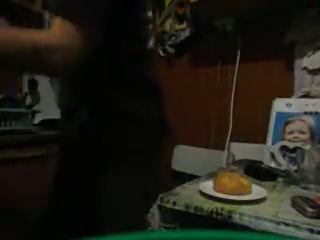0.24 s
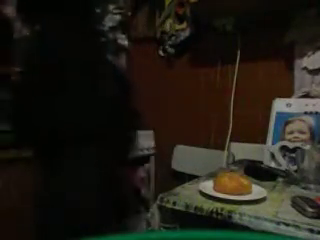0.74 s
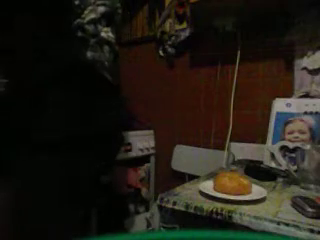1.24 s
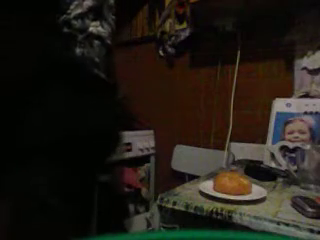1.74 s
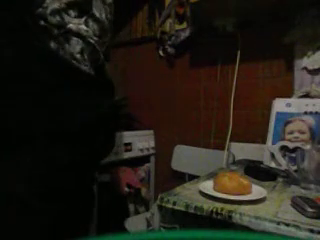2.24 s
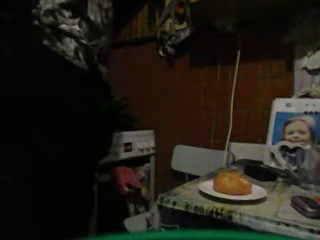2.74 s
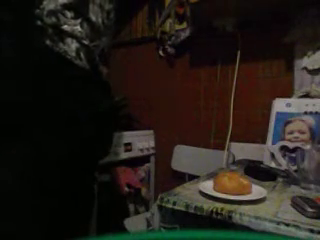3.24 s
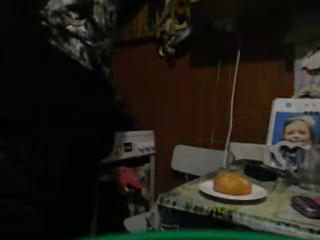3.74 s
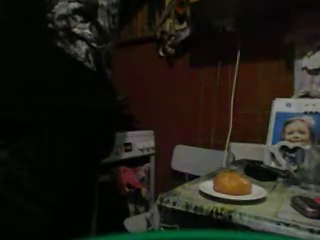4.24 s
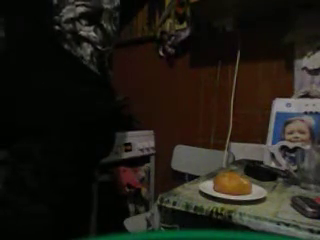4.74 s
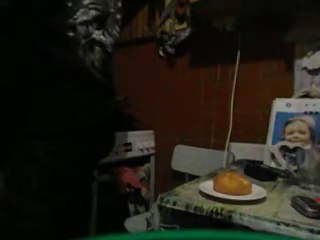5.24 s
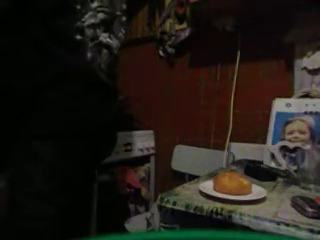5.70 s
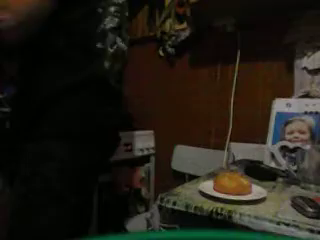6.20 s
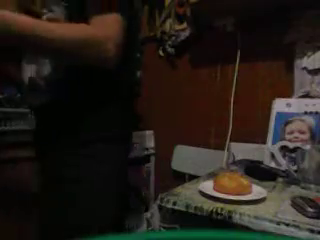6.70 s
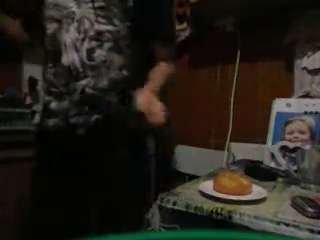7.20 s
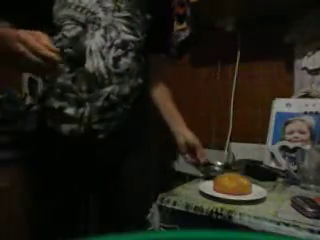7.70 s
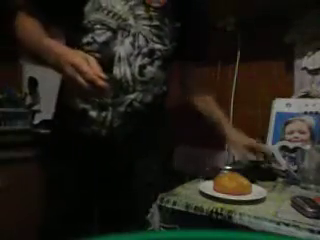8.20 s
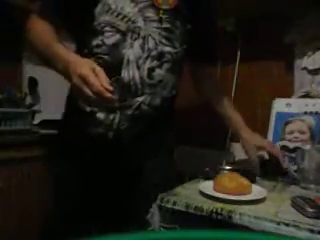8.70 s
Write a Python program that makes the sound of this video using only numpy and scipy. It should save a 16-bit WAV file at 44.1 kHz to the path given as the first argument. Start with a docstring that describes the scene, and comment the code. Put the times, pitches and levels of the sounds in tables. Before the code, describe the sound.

Soft thuds, a burst of clattering dishes, two sharp wooden knocks, then a bowl set down and faint metal ringing over hiss.

```python
"""Light taps and soft thuds of feet and a cupboard come first, over a faint rustle in a small kitchen.
Then crockery rattles in a rack, the cupboard door knocks, a bowl is set down and a steel dish rings.
Each rattle or knock is a burst of tiny contacts that set the object ringing. A cheap 8-bit converter
rounds the sound coarsely, so a slow pressure drift flips the last bit and makes the hiss stutter."""
import sys
import numpy as np
from scipy import signal
from scipy.fft import rfft, irfft, next_fast_len
from scipy.io import wavfile

SR = 44100
rng = np.random.default_rng(int(sys.argv[2]) if len(sys.argv) > 2 else 0)


def unload_wav(signal):
    """Save mono or channel-first audio to the path in sys.argv[1] as 16-bit WAV at rate SR, clipped to [-1, 1]."""
    wavfile.write(
        sys.argv[1],
        SR,
        np.round(np.clip(np.atleast_2d(signal).T, -1, 1) * 32767).astype(np.int16),
    )


N = 394694


def from_db(db):
    """Turn decibels into a gain."""
    return 10 ** (np.asarray(db) / 20)


def ring(clicks, hz, ring_s):
    """Each click starts a tone that fades by 60 dB over its ring time, ring_s."""
    fade, turn = from_db(-60 / (ring_s * SR)), 2 * np.pi * hz / SR
    return signal.lfilter([0, np.sin(turn)], [1, -2 * fade * np.cos(turn), fade * fade], clicks + 1e-18)


def coloured(gain_at):
    """Noise of average power 1, with its lows and highs shaped by gain_at(hz)."""
    size = next_fast_len(N)
    hz = np.fft.rfftfreq(size, 1 / SR) + .1
    noise = irfft(rfft(rng.standard_normal(size)) * gain_at(hz), size)[:N]
    return noise / np.sqrt(np.mean(noise ** 2) + 1e-20)


# Slow swings of air pressure. Each row: centre in Hz, width in Hz, level in dB.
PRESSURE_SWINGS = [(1.475, 1.7, -44.5), (11.12, 9.2, -43), (30.1, 41, -59)]

def air():
    """The pressure drifts, mostly too slowly to hear, under the room's low murmur."""
    drift = sum(from_db(db) * coloured(lambda f: 1 / (1 + ((f - hz) / width) ** 2))
                for hz, width, db in PRESSURE_SWINGS)
    murmur = from_db(-58) * coloured(lambda f: 1 / (1 + (f / 250) ** 2))
    return drift + murmur


# Cloth and hands moving all along. Each row: time in seconds, level in dB.
RUSTLE_LEVELS = [(0, -51), (.6, -58.5), (1.1, -58.5), (1.8, -56.5), (2.5, -63.5), (3.201, -55),
                 (3.501, -47), (4.401, -48), (4.75, -56), (5.1, -57), (5.8, -63.5), (6.5, -56.5),
                 (7.302, -57.5), (8.1, -58.5), (8.95, -64.5)]
# The tone of the rustle. Each row: frequency in Hz, level in dB.
RUSTLE_TONE = [(100, -24), (700, -12.5), (1500, -5.5), (2400, -2.5), (3500, -5.5), (5000, -6.5),
               (6000, -15.5)]
# Quick arm movements. Each row: middle in seconds, top level in dB, half length in seconds.
ARM_SWISHES = [(7.139, -49, 0.099), (7.491, -41.5, 0.059), (8.325, -51.5, 0.03), (8.531, -50, 0.061)]

def rustle():
    """Rubbing cloth makes a soft hiss that swells with each movement."""
    t = np.arange(N) / SR
    hz, tone_db = np.transpose(RUSTLE_TONE)
    hiss = coloured(lambda f: from_db(np.interp(np.log(f), np.log(hz), tone_db)))
    handling = from_db(np.interp(t, *np.transpose(RUSTLE_LEVELS)))
    swishes = sum(from_db(db) * np.exp(-((t - at) / half_s) ** 2) for at, db, half_s in ARM_SWISHES)
    return (handling + swishes) * hiss


# Touches on the steel dish. Each row: start in seconds, level in dB.
STEEL_TOUCHES = [(7.82, -46.5), (7.9, -44), (8.277, -44.5)]
# The dish's tones. Each row: pitch in Hz, level in dB, ring time in seconds.
STEEL_TONES = [(700, -12, 1.0), (1152, -17, 1.5), (1895, -10, 4.0), (2245, -6, .3), (3854, -5, .9),
               (4910, -1, .5)]

def steel_dish():
    """Steel rings on with a few thin tones after each touch."""
    clicks = np.zeros(N)
    for start_s, db in STEEL_TOUCHES:
        clicks[round(start_s * SR)] = from_db(db)
    return sum(from_db(db) * ring(clicks, hz, ring_s) for hz, db, ring_s in STEEL_TONES)


# Soft blows. Each row: start in seconds, floor, cupboard and door levels in dB, loss per bounce in dB.
BLOWS = [(0.222, -60, -73, -52, 14), (.41, -76, -64.5, -49.5, 1), (.49, -62, -65, -53.5, 1.5),
         (0.745, -36.5, -34, -39.5, 2), (.861, -42.5, -48.5, -45.5, 2), (.945, -33, -32, -40, 3),
         (1.217, -39.5, -44, -51, 14.5), (1.629, -51.5, -45, -45, 4), (1.749, -60.5, -58, -53, 2.5),
         (1.95, -52.5, -39.5, -58.5, 14.5), (5.378, -30.5, -39, -46, 9), (5.408, -32, -20.5, -32, 4),
         (6.281, -11.5, -15.5, -11, 3.5), (6.37, -27, -32.5, -31.5, 3), (6.535, -17, -18.5, -16, 5),
         (6.625, -42, -46, -30.5, 4.5), (6.72, -48.5, -49, -47, 3), (6.848, -31, -37.5, -38, 3.5),
         (7.683, -55, -34.5, -31.5, 24), (8.316, -36, -36.5, -38, 7.5)]
# How hard a dish hit shakes the floor, cupboard and door, in dB compared with the hit.
SHAKE_DB = [-49.5, -44.5, -41]
# Deep tones. Each row: pitch in Hz, level in dB, ring time in seconds, part (0 floor, 1 cupboard, 2 door).
DEEP_TONES = [(44.3, -4, 0.21, 0), (70.3, -0.5, 0.15, 0), (94.5, -6, .15, 0), (123.6, -9.5, 0.1, 1),
              (146.8, -2, 0.21, 1), (190.5, -8.5, 0.25, 2), (217.5, -5, .28, 2), (233, -0.5, .2, 2),
              (259, -6, 0.16, 2)]

def thuds(bounce_s=0.017, shake_loss_db=3.5):
    """Soft blows and the DISH_HITS (below) shake floor, cupboard and door in five fading pushes."""
    shakes = [(start_s, *(db + np.array(SHAKE_DB)), shake_loss_db) for start_s, db, *_ in DISH_HITS]
    blows = np.array(BLOWS + shakes)
    start_s, part_db, loss_db = blows[:, :1], blows[:, 1:4], blows[:, 4:]
    bounce = np.arange(5)
    delay_s = bounce_s * bounce * rng.uniform(0.9, 1.2, size=(len(blows), 5))
    at = np.round((start_s + delay_s) * SR).astype(int)
    signs = rng.choice([-1, 1], size=(len(blows), 5, len(DEEP_TONES)))
    boom = 0
    for sign, (hz, db, ring_s, part) in zip(np.moveaxis(signs, 2, 0), DEEP_TONES):
        pushes = np.zeros(N)
        pushes[at] = sign * from_db(part_db[:, round(part), None] - loss_db * bounce + db)
        boom = boom + ring(pushes, hz, ring_s)
    return signal.sosfilt(signal.butter(2, [48, 330], "band", fs=SR, output="sos"), boom)


def chatter(length_s, settle_s, soft_start, first_db, contacts_per_s, uneven_db):
    """Two things meet: one first contact, then uneven ones that go on for a while and settle."""
    t = np.arange(round(.25 * SR)) / SR
    sizes = from_db(uneven_db * np.minimum(rng.exponential(1, t.size), 3)) * rng.choice([-1, 1], t.size)
    touching = rng.random(t.size) < contacts_per_s / SR
    touching[0], sizes[0] = True, from_db(first_db)
    swell = 1 - soft_start * np.exp(-t / (.18 * length_s))
    shape = swell * np.exp(-np.maximum(t - length_s, 0) / settle_s)
    clicks = sizes * touching * shape
    return clicks * np.linalg.norm(shape) / np.linalg.norm(clicks)   # the shape alone sets the energy


def struck(hits, tones, ring_db, crack_db, crack_hz, crack_reach, focus_db, damping, **contacts):
    """Each contact makes a short crack and rings all the tones; damping divides their ring times."""
    hz, tone_db, ring_s = np.transpose(tones)
    drive, crack = np.zeros((len(tones), N + SR)), np.zeros(N + SR)
    spots, spot_s = 16, .024   # the pieces meet at a new spot this often, harder or softer
    for start_s, level_db, length_s, settle_s, low_hz, high_hz, hard_db in hits:
        at = round(start_s * SR)
        clicks = from_db(level_db) * chatter(length_s, settle_s, **contacts)
        spot = np.minimum(np.arange(clicks.size) / SR / spot_s, spots - 1).astype(int)
        force_db = 1.4 * rng.standard_normal(spots) * (np.arange(spots) > 0)
        clicks = clicks * from_db(force_db)[spot]
        # Tones near the pitches of the two pieces get up to focus_db extra.
        octaves_away = np.minimum(abs(np.log2(hz / low_hz)), abs(np.log2(hz / high_hz)))
        near = np.exp(-(octaves_away / 0.069) ** 2)
        tilt_db = np.clip(hard_db, -6, 4) * np.log2(hz / crack_hz)   # a harder contact is brighter
        chance = from_db(2.5 * rng.standard_normal((hz.size, spots)))
        chance *= rng.choice([-1, 1], size=chance.shape)
        gains = from_db(ring_db + tone_db + focus_db * near + tilt_db)[:, None] * chance
        drive[:, at:at + clicks.size] += gains[:, spot] * clicks
        centre_hz = crack_hz * np.clip(from_db(0.66 * hard_db), .3, 2)
        edges_hz = [centre_hz / crack_reach, min(centre_hz * 1.9, 9000)]
        band = signal.butter(3, edges_hz, "band", fs=SR, output="sos")
        crack[at:at + clicks.size] += from_db(crack_db) * signal.sosfilt(band, clicks)
    ringing = sum(map(ring, drive, hz, ring_s / damping))
    return (crack + ringing)[:N]


# The bowl lands. Each row: start in seconds, level in dB, chatter and settling times in seconds,
# pitches of the lower and higher piece in Hz, hardness in dB per octave (more is brighter).
BOWL_LANDING = [(7.681, -13.5, 0.02, 0.025, 1160, 1980, -2.4)]
# The bowl's tones. Each row: pitch in Hz, level in dB, ring time in seconds before damping.
BOWL_TONES = [(328, -6, .14), (528, -8, .22), (861, -10, .15), (926, -8, .15), (1157, -3, .22),
              (1400, -6, .08), (1593, -5, .1), (1809, -8, .18), (1949, -4, .14), (2121, -7, .18),
              (2363, -10, .12)]

def bowl():
    """A bowl meets the table, chatters and rings briefly."""
    return struck(BOWL_LANDING, BOWL_TONES, ring_db=-40.5, focus_db=2.5, damping=1.3,
                  crack_db=-2, crack_hz=955, crack_reach=3.4,
                  first_db=7, contacts_per_s=390, uneven_db=-4.5, soft_start=0.041)


# Taps and door knocks. Each row reads as in BOWL_LANDING.
WOOD_HITS = [(.206, -21.5, 0.012, 0.0051, 1200, 4900, 10), (.224, -23, 0.0066, 0.021, 1480, 4310, 5),
             (.795, -29.5, 0.01, .01, 436, 1640, -2.5), (.949, -33.5, 0.015, 0.014, 516, 3300, -4),
             (1.052, -36.5, 0.02, 0.013, 1370, 2920, 1.5), (1.212, -26, 0.0071, .01, 1470, 2780, 2.5),
             (1.329, -42, 0.016, .01, 3060, 4500, 4), (1.619, -36.5, 0.0083, .01, 431, 2440, -7),
             (5.381, -31, 0.013, .01, 540, 2360, -5.5), (5.406, -10, 0.0064, 0.011, 1340, 1920, -4.5),
             (6.282, 0, 0.013, 0.015, 1170, 2960, 2.5), (6.31, -6.5, 0.0058, 0.024, 1500, 2600, -1.5),
             (6.449, -36.5, .009, .01, 2800, 4700, 3), (6.532, -5, 0.014, 0.014, 1490, 2710, 1),
             (6.844, -30, 0.016, 0.011, 1110, 2500, -3)]
# The wood's tones. Each row: pitch in Hz, level in dB, ring time in seconds before damping.
WOOD_TONES = [(517, -9, .04), (790, -5, .035), (880, -4, .04), (1060, -3, .04), (1340, -1, .04),
              (1650, -4, .035), (2000, -3, .035), (2470, -2, .035), (2800, 0, .035), (3300, -3, .03),
              (4200, -3, .03), (4900, -3, .03)]

def wood_knocks():
    """Wood stops ringing almost at once, so taps and door knocks sound dry."""
    return struck(WOOD_HITS, WOOD_TONES, ring_db=-45, focus_db=3, damping=2.2,
                  crack_db=-6, crack_hz=1807, crack_reach=5.7,
                  first_db=9.5, contacts_per_s=2100, uneven_db=3.0, soft_start=0.043)


# Crockery rattles in the rack, then clicks as the bowl lands and the steel dish is touched.
# Each row reads as in BOWL_LANDING.
DISH_HITS = [(2.643, -18.5, 0.03, 0.016, 1360, 1997, -3), (2.874, -20, 0.016, 0.019, 2015, 2163, 0),
             (2.948, -20.5, 0.021, 0.014, 1046, 4100, 1), (2.989, -6, 0.046, 0.026, 2044, 3490, 1),
             (3.076, -17, 0.015, 0.011, 2040, 2560, -3), (3.167, -12, 0.007, 0.012, 1944, 2550, -1.5),
             (3.392, -5, 0.0086, .015, 1870, 2930, 10), (3.248, -33.5, 0.014, 0.013, 1228, 2670, -9),
             (3.428, -23, .007, 0.024, 950, 2840, -4), (3.562, -17, 0.019, 0.015, 1800, 3560, 8.5),
             (3.597, 4.5, 0.065, 0.017, 2023, 3500, 2.5), (3.669, 3, 0.084, 0.0074, 1970, 2625, 1.5),
             (3.759, -6.5, 0.0095, 0.032, 1930, 2590, 0), (3.888, -2.5, 0.01, .015, 2030, 4370, 4),
             (3.942, -9, 0.016, 0.0087, 1570, 2470, 0.5), (3.975, -2, .02, 0.018, 1334, 2036, -0.5),
             (4.113, -20.5, 0.034, 0.015, 1262, 2025, -4), (4.185, -16, 0.028, .01, 1755, 2070, 1),
             (4.215, -14.5, .045, 0.022, 920, 2280, 1.5), (4.288, -26, 0.026, 0.012, 910, 3580, 0.5),
             (4.407, -21, 0.024, 0.042, 944, 3220, 1.5), (4.534, 2.5, .06, 0.013, 1122, 4380, 1.5),
             (4.559, -6, 0.033, 0.012, 2040, 2630, 3), (4.611, -9, 0.0077, 0.016, 1095, 4020, -3),
             (4.803, -40, 0.022, 0.0086, 1870, 2270, 0.5), (4.9, -42.5, 0.023, 0.013, 1850, 2240, -0.5),
             (7.68, -29.5, 0.011, 0.013, 4340, 4650, 6), (7.785, -28, 0.0065, .008, 4240, 4680, 8),
             (7.818, -16.5, 0.013, 0.007, 1244, 2150, -1.5), (7.849, -22.5, 0.018, 0.0081, 1400, 2230, 1),
             (7.899, -19.5, 0.0077, .015, 1890, 2470, 2.5), (8.28, -29.5, 0.016, 0.0068, 1870, 2240, 1.5)]
# The crockery's tones. Each row: pitch in Hz, level in dB, ring time in seconds before damping.
CROCKERY_TONES = [(543, -15.5, 0.14), (821, -9, 0.16), (924, -4, 0.18), (1090, 0.5, 0.045),
                  (1280.7, -5, 0.13), (1480, -13, 0.056), (1680, -6, 0.036), (1760, -11.5, 0.23),
                  (1936, -2.5, 0.12), (2050, -4.5, 0.091), (2252, -7.5, 0.27), (2205, -9, .1),
                  (2564, -4, 0.088), (2650, -7, 0.19), (2805, -5.5, 0.12), (3050, -9.5, 0.18),
                  (3163, -5.5, 0.13), (3318, -8, 0.11), (3554, -4, 0.04), (4210, -12, 0.14),
                  (4100, -1.5, 0.054), (4244, -5, 0.067), (4296, -2.5, 0.086), (4550, -8.5, 0.065),
                  (5030, -6.5, 0.19), (5060, -12, 0.039), (5360, -10.5, 0.18)]

def crockery():
    """Hard dishes click and ring, most of all the two pieces that meet."""
    return struck(DISH_HITS, CROCKERY_TONES, ring_db=-51, focus_db=11, damping=1.6,
                  crack_db=-11, crack_hz=2407, crack_reach=2.76,
                  first_db=6.5, contacts_per_s=1200, uneven_db=2.5, soft_start=0.3)


def room(sound, ring_s=0.19, echo_db=-4):
    """Nearby walls add dense echoes that fade evenly."""
    t = np.arange(round(.4 * SR)) / SR
    tail = rng.standard_normal(t.size) * from_db(-60 * t / ring_s) * (t > .003)
    return sound + from_db(echo_db) * signal.fftconvolve(sound, tail / np.linalg.norm(tail))[:N]


def scene():
    """All sources in one channel; only the crockery, knocks and bowl echo."""
    return (room(crockery() + wood_knocks() + bowl()) + thuds() + steel_dish() + rustle() + air())[None]


def record(dry):
    """The converter keeps every fourth sample in 8 bits; the rounding adds the stuttering hiss."""
    step, offset = np.sqrt(.5) / 128, -.003   # the size of the last bit, and a steady shift off zero
    dulled = signal.sosfilt(signal.butter(4, 5200, fs=SR, output="sos"), dry + offset)
    codes = np.clip(np.floor(dulled[:, ::4] / step + .5), -128, 127)
    smoother = signal.firwin(129, SR / 8, window=("kaiser", 9), fs=SR)
    full_rate = signal.resample_poly(codes * step, 4, 1, axis=1, window=smoother)[:, :N]
    clipped = np.clip(full_rate, -128 * step, 128 * step)   # smoothing overshoots and is clipped again
    return signal.sosfilt(signal.cheby2(12, 70, 16800, fs=SR, output="sos"), clipped)


dry = scene()
out = record(dry)
unload_wav(out)
```